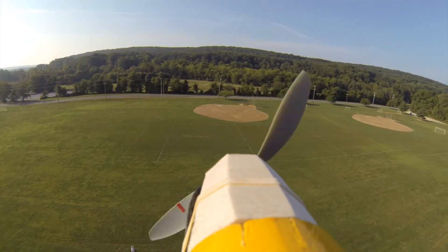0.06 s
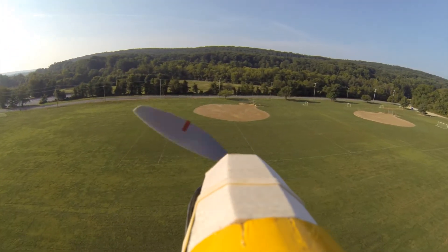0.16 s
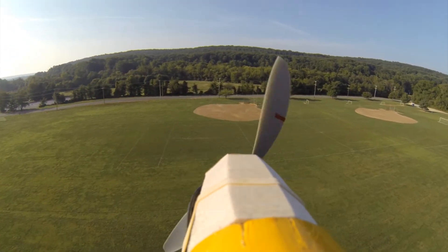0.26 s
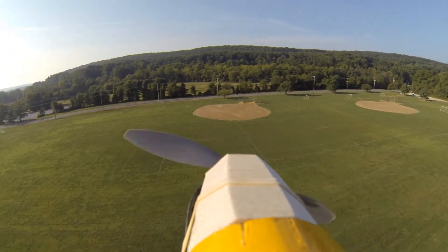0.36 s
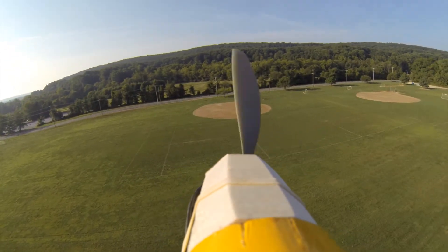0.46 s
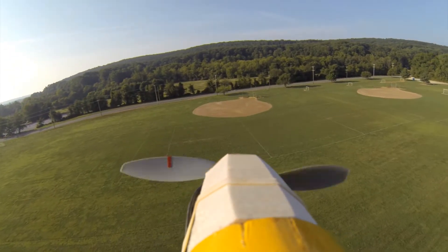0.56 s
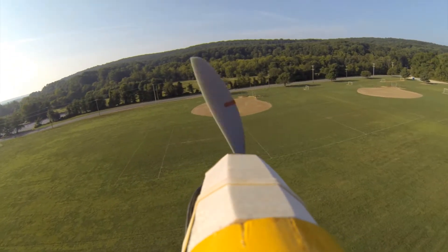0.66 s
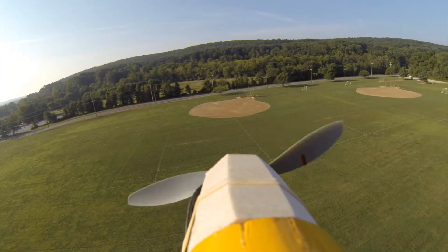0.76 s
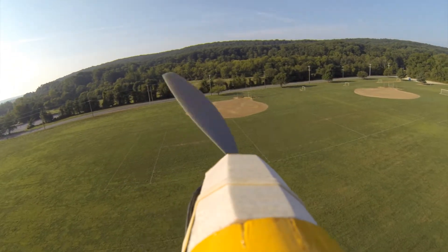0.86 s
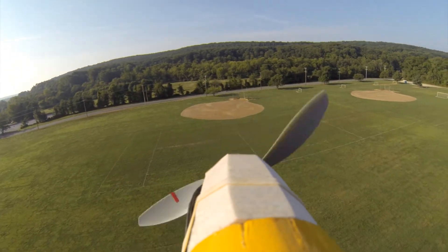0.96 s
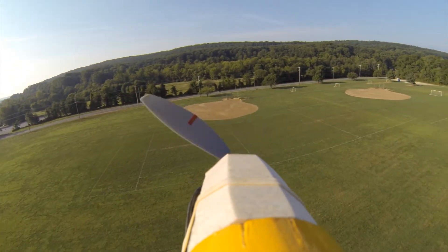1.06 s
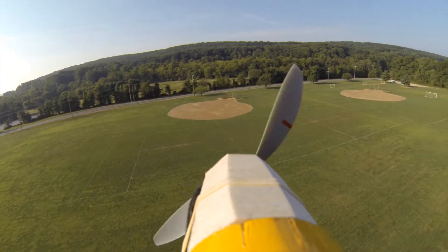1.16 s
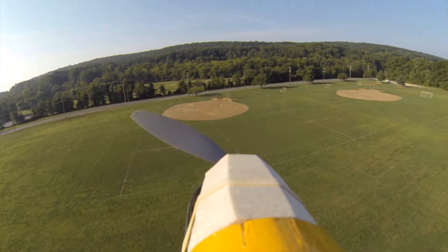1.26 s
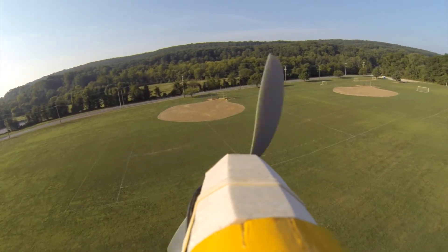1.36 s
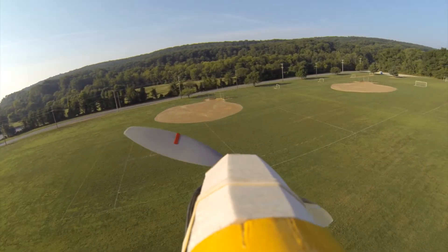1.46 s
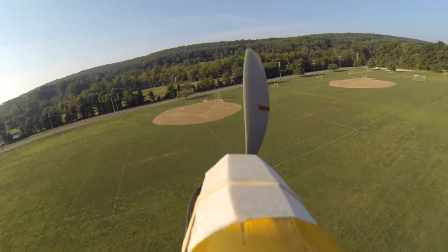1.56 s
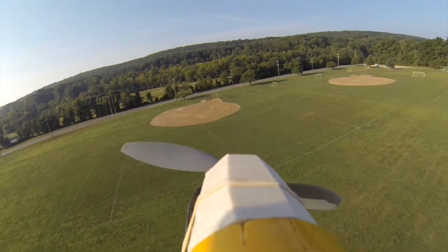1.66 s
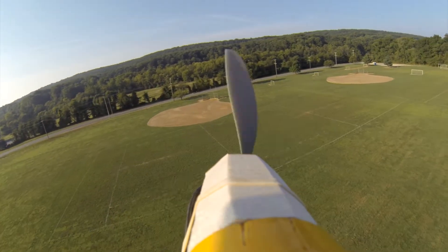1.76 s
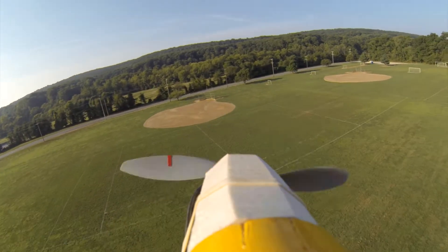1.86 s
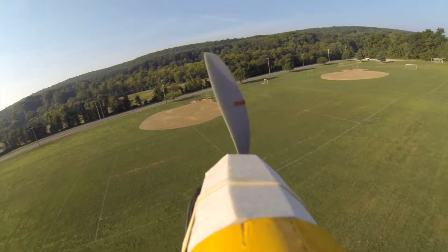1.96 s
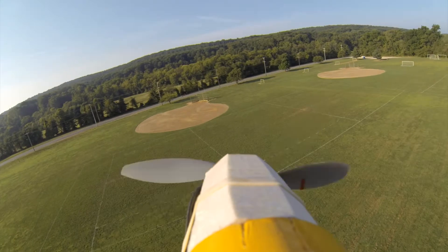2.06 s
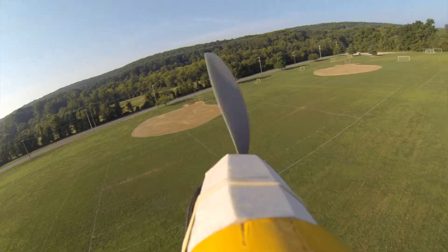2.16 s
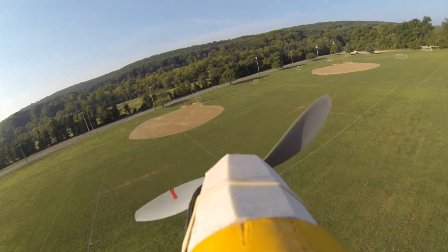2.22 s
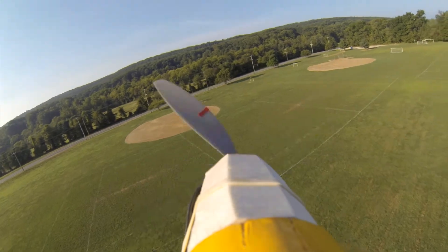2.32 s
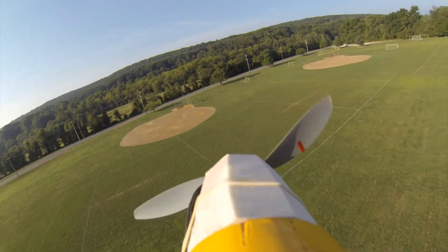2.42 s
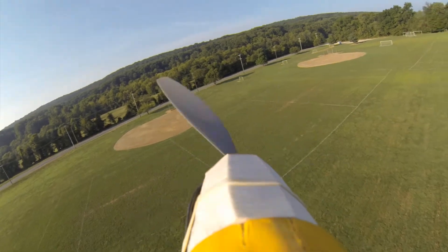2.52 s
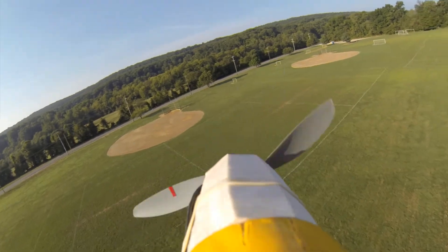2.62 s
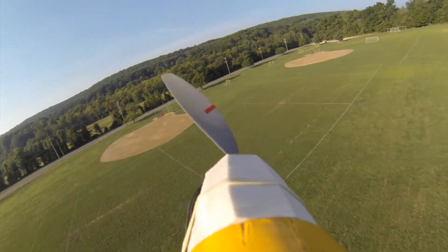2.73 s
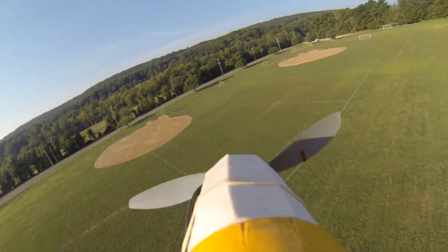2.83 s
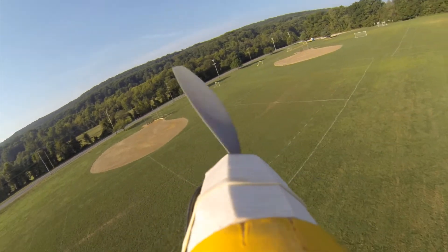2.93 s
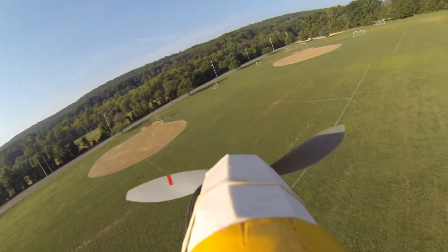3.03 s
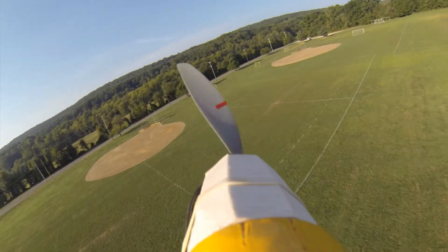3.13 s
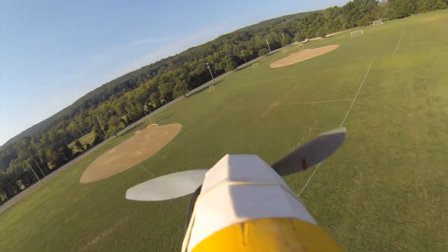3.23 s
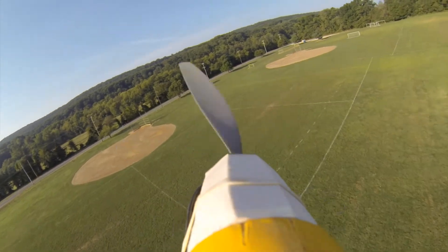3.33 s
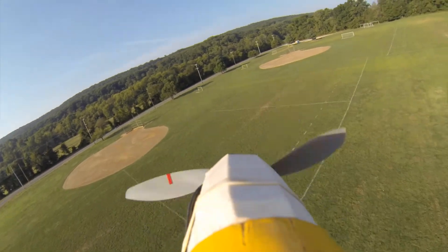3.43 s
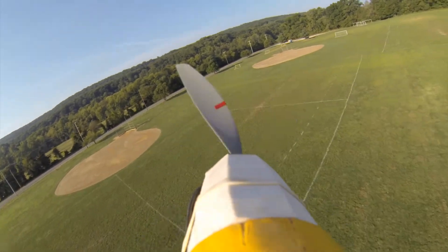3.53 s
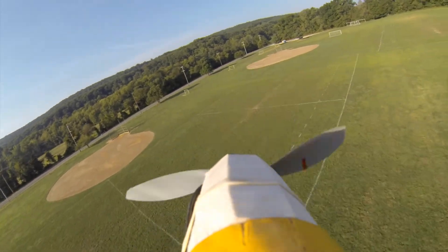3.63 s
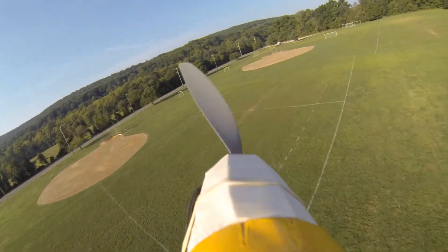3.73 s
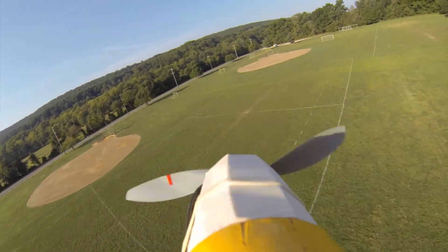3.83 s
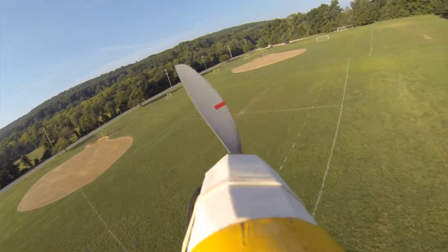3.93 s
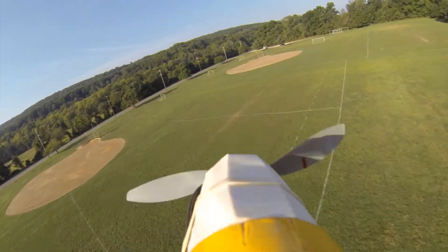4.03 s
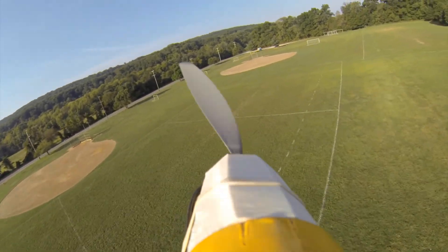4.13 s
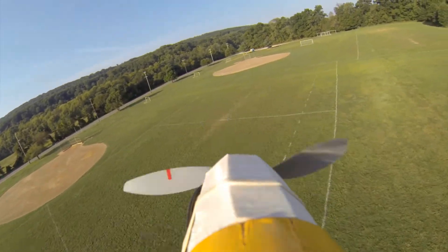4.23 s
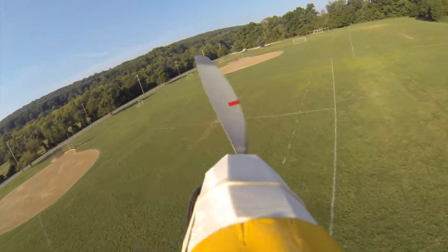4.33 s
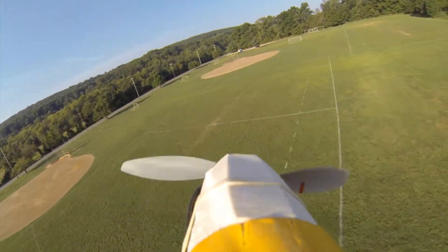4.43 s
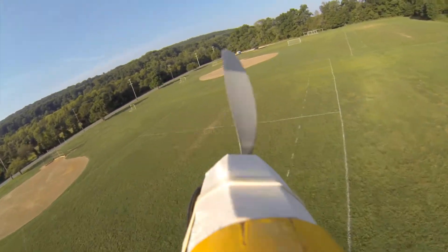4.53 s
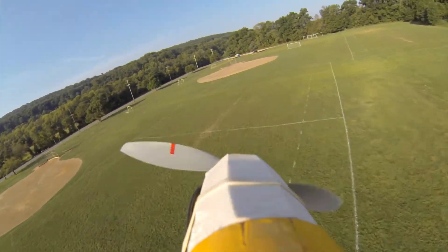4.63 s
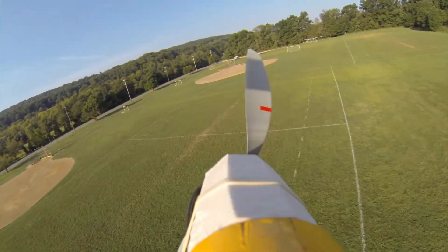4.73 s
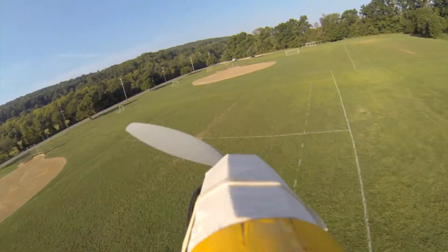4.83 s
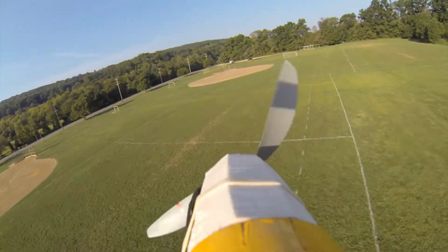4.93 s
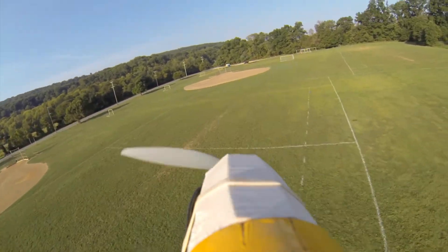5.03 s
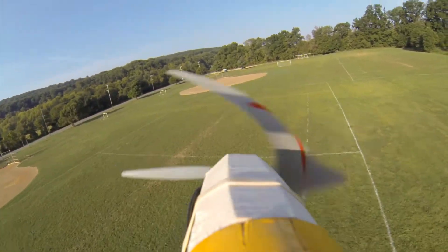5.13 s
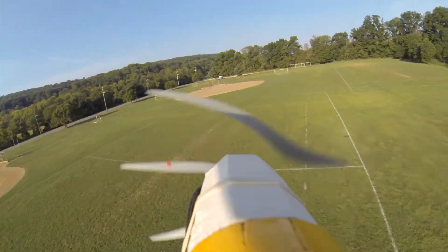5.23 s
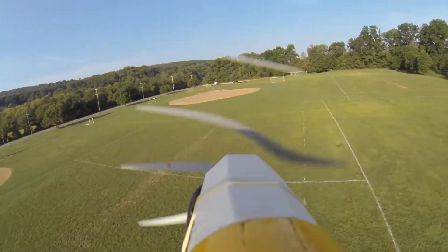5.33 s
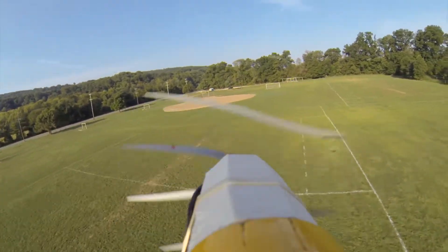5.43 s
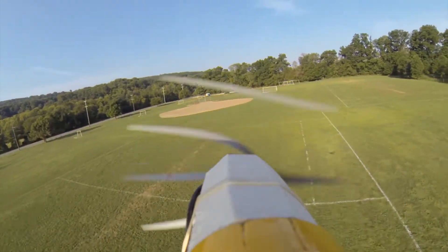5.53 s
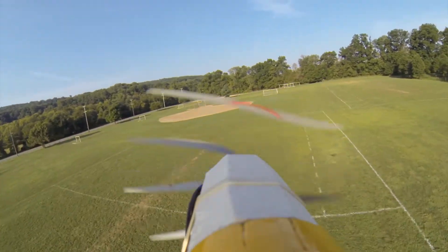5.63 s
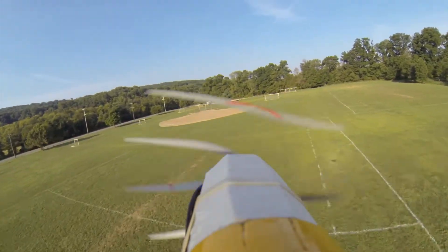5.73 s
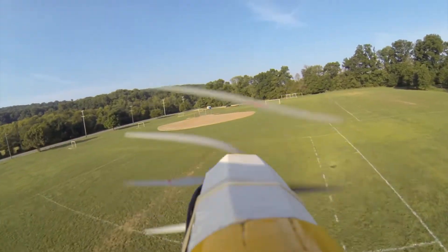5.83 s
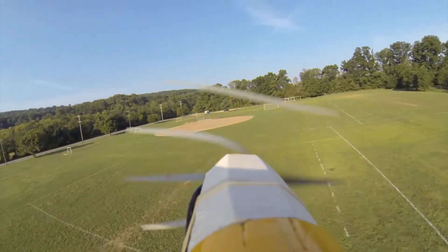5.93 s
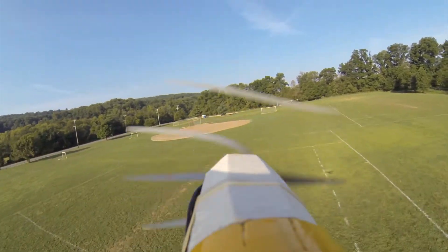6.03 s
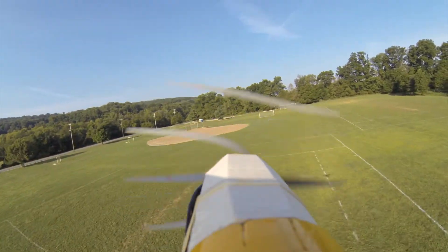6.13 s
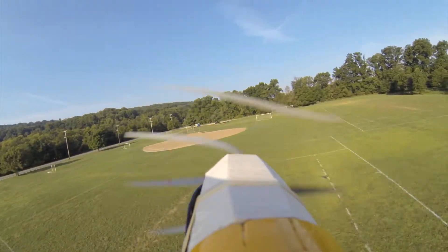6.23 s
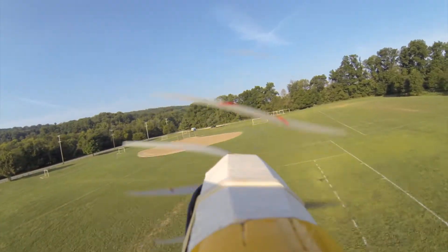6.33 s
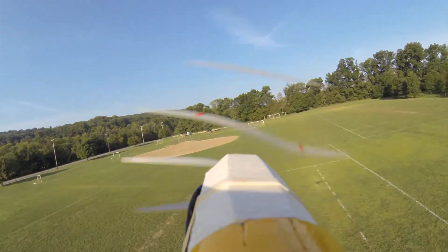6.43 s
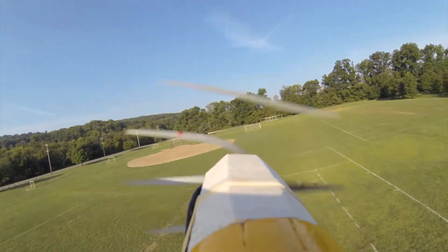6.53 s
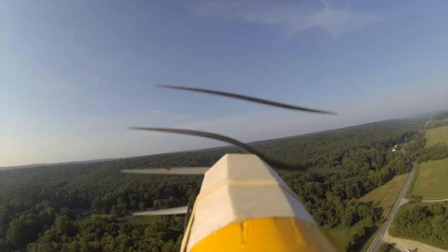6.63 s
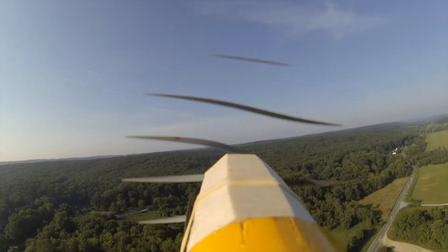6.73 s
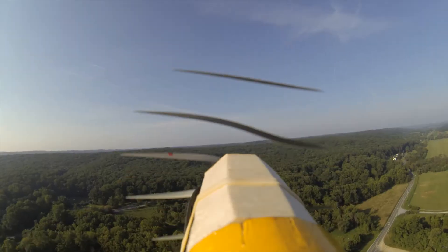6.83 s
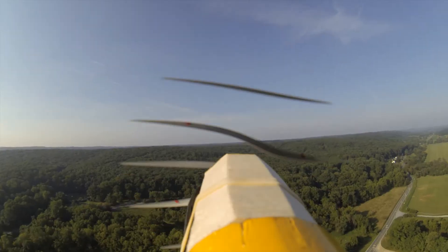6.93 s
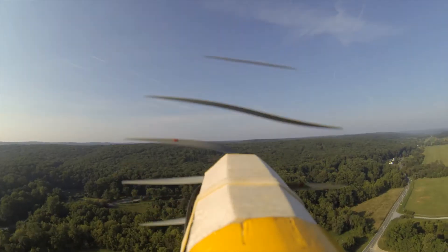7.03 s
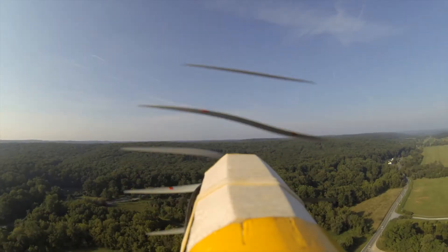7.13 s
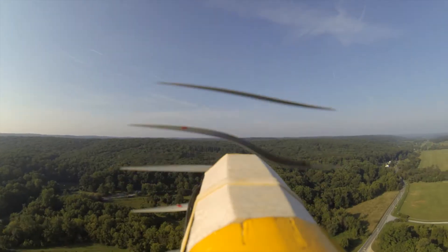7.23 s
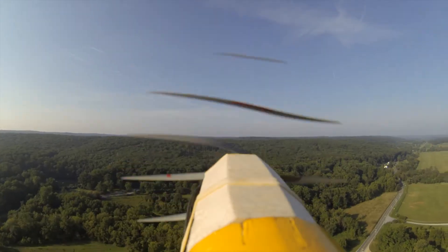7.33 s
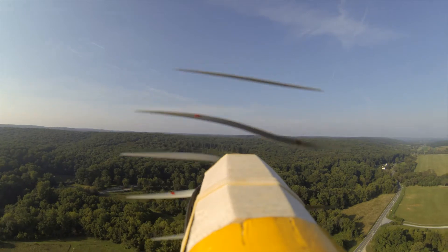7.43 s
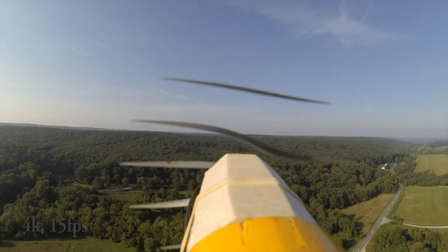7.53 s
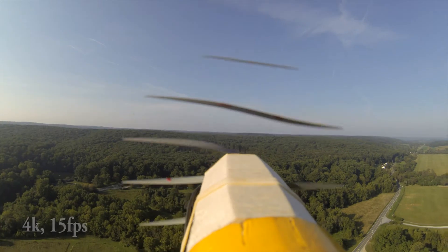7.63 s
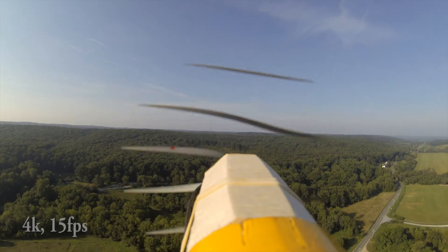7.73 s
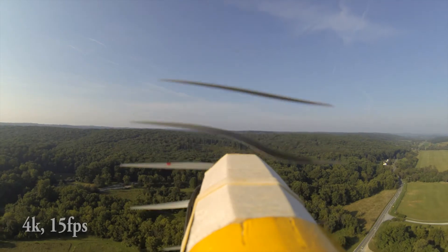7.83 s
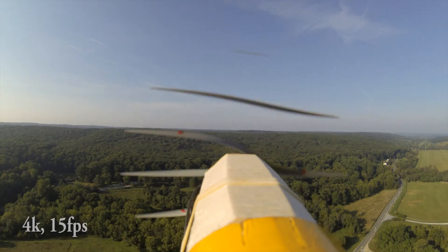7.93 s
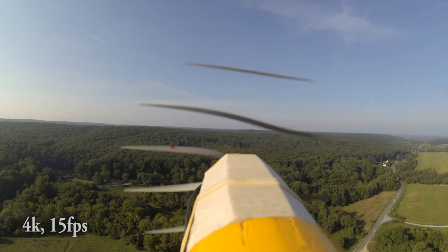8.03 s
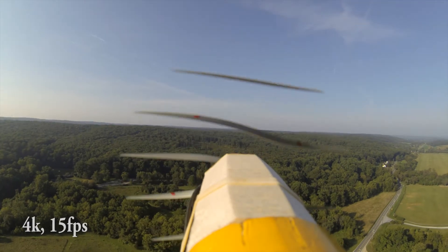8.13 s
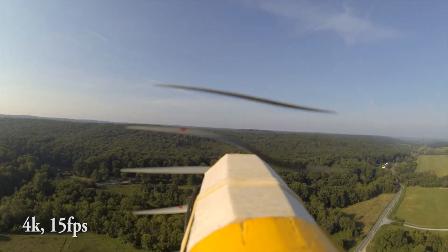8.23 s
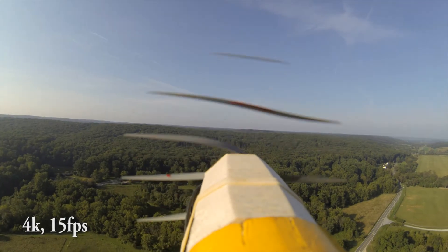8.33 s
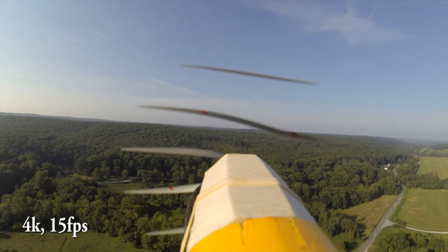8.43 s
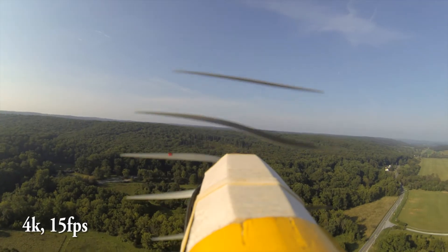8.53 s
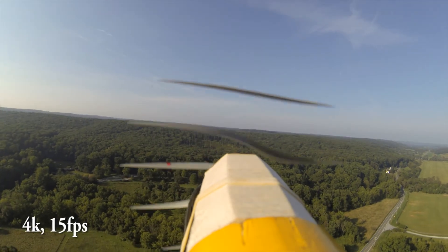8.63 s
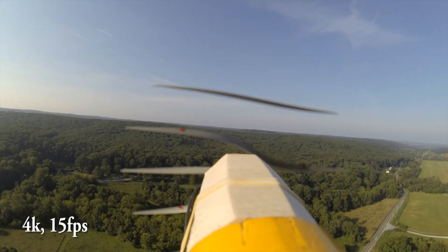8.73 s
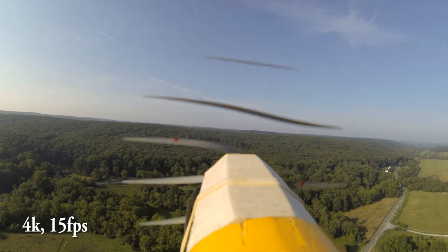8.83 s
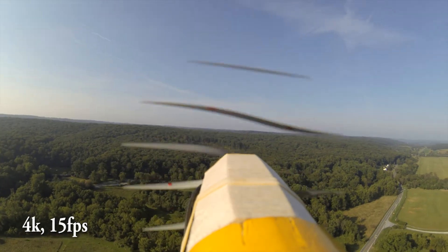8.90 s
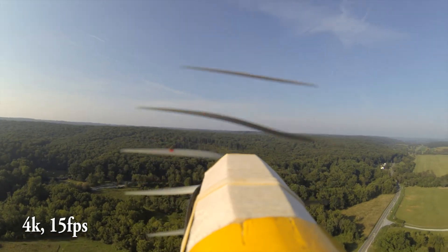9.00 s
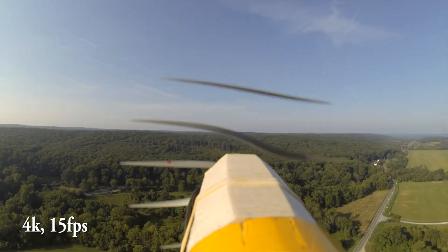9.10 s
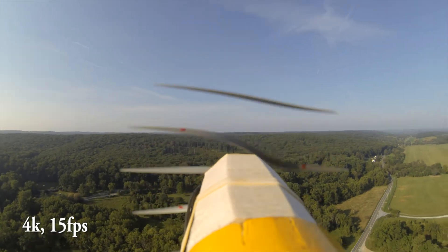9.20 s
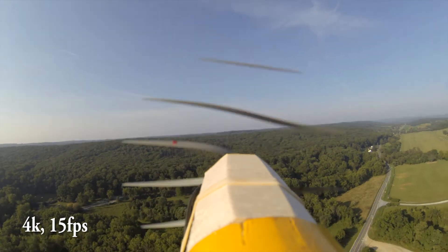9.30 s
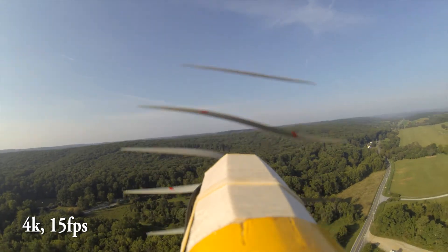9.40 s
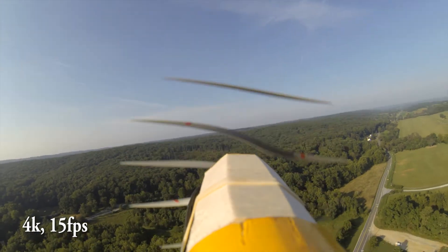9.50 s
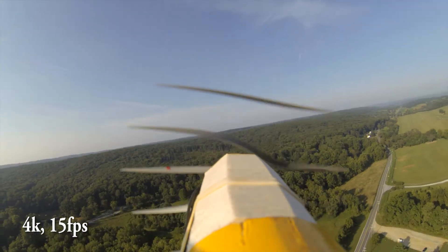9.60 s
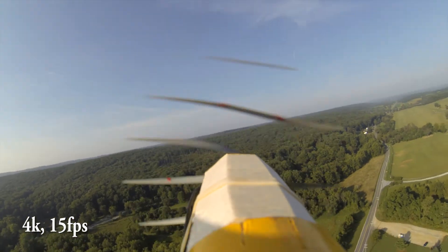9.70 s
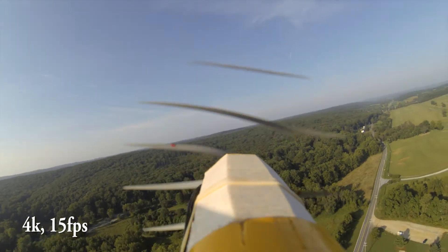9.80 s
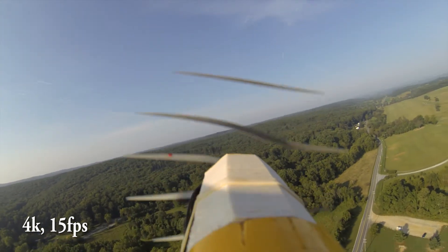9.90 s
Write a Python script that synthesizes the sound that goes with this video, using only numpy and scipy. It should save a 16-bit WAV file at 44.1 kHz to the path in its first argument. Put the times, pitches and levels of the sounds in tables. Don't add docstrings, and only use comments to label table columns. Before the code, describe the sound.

Close, dull gusts flap regularly against an onboard microphone while a small plane glides over open ground, with quiet air between. Halfway through, the electric motor sweeps up quickly, blade beats blur into a low flutter, and loud turbulent wind takes over. A thin high whine continues underneath, then changes to a higher steady cruise with a few tiny ticks.

```python
import sys
import numpy as np
from scipy import signal
from scipy.fft import rfft, irfft, next_fast_len
from scipy.io import wavfile
from scipy.ndimage import uniform_filter1d, minimum_filter1d

SR = 44100
rng = np.random.default_rng(int(sys.argv[2]) if len(sys.argv) > 2 else 0)


def transcribe(signal):
    frames = np.atleast_2d(signal).T
    limited = np.clip(frames, -1, 1)
    pcm = np.round(limited * 32767).astype(np.int16)
    wavfile.write(sys.argv[1], SR, pcm)


def voltage_ratio(level):
    return 10 ** (np.asarray(level, float) / 20)


N = 439236
T = np.arange(N) / SR
SLOTS, BLADES = 48, 2

# start_s, body_db [dB], rumble_db [dB], length_s
WAKES = [(0.084, -15, -18, 0.075), (0.301, -19.5, -20.5, 0.13), (0.522, -19, -17, 0.077),
         (0.746, -17, -18, 0.082), (0.981, -11.5, -12, 0.051), (1.196, -21, -18, 0.062),
         (1.382, -18.5, -19.5, 0.096), (1.602, -16.5, -17, 0.1), (1.814, -19, -21, 0.062),
         (2.019, -16.5, -19.5, 0.091), (2.218, -17.5, -18, 0.084), (2.418, -17, -18, 0.097),
         (2.626, -16.5, -16.5, 0.059), (2.82, -17.5, -15.5, 0.091), (3.007, -19, -17, 0.098),
         (3.217, -17, -17, 0.082), (3.429, -16, -18.5, 0.063), (3.616, -15, -16.5, 0.078),
         (3.814, -20, -18, 0.08), (4.029, -18.5, -18.5, 0.074), (4.207, -23, -18, 0.08),
         (4.405, -16, -20, 0.078), (4.604, -17, -19, 0.071), (4.795, -13.5, -17, 0.079),
         (4.98, -12, -20, 0.052), (5.084, -26, -23, 0.074)]


def evened(x):
    return x / np.sqrt(np.mean(x ** 2) + 1e-20)


def columns(rows):
    s, *values = np.transpose(rows)
    return [np.interp(T, s, v) for v in values]


def wander(hz):
    lowpass = signal.butter(2, hz, fs=SR, output="sos")
    return evened(signal.sosfilt(lowpass, rng.standard_normal(N)))


def coloured(x, lo_hz, hi_hz):
    # pitch_hz, density_db [dB per Hz]
    turbulence = [(12, -45), (30, -36), (70, -31.5), (200, -39.5), (500, -44), (1000, -50), (2000, -57.5),
                  (3000, -65), (4200, -75.5), (6000, -90), (9000, -104), (12000, -115), (12600, -130),
                  (15000, -140)]
    size = next_fast_len(N)
    hz = np.fft.rfftfreq(size, 1 / SR) + 1
    f, db = np.transpose(turbulence)
    spectrum = voltage_ratio(np.interp(np.log(hz), np.log(f), db))
    edges = 1 / np.sqrt((1 + (lo_hz / hz) ** 4) * (1 + (hz / hi_hz) ** 4))
    return irfft(rfft(x, size) * spectrum * edges, size)[:N]


def wakes():
    rise_s = 0.006
    power = np.zeros((4, N))
    for s, body_db, rumble_db, length_s in WAKES:
        at = slice(max(round((s - .03) * SR), 0), round((s + .25) * SR))
        t = T[at] - s
        rise = 1 / (1 + np.exp(-(t - rise_s) / (0.19 * rise_s + 1e-4)))
        shape = rise * np.exp(-(np.maximum(t, 0) / length_s) ** 4.95)
        fizz_db = body_db - 37.5 + 0.6 * s - 11.5
        levels_db = np.array([rumble_db - 1.0, body_db - 12.5, fizz_db])
        power[:3, at] += (voltage_ratio(levels_db)[:, None] * shape) ** 2
        power[3, at] += (voltage_ratio(fizz_db - 91 * t) * shape) ** 2
    return power


def lulls():
    s, length_s = np.array(WAKES)[:-2, [0, 3]].T[:, :, None]
    lull_s, lull_width_s, lull_db = .035, 0.041, -1
    swell_s, swell_width_s, swell_db = .16, 0.038, 2
    coarse = np.arange(0, N / SR, .002)
    t = coarse - s
    lull = lull_db * np.exp(-((t - length_s - lull_s) / lull_width_s) ** 2)
    swell = swell_db * np.exp(-((t - swell_s) / swell_width_s) ** 2)
    return np.interp(T, coarse, (lull + swell).sum(axis=0))


def stream():
    # start_s, strength_db [dB], fineness_db [dB]
    air_flow = [(0, -43, -2.5), (1.3, -41.5, -3), (1.8, -38, -0.5), (3.3, -40, -1), (3.6, -42.5, -5),
                (5.06, -42, -1.5), (5.2, -35, -5), (5.4, -38, -2.5), (5.52, -30.5, -0.5),
                (6.2, -29.5, -2.5), (6.5, -31, 2), (6.85, -28.5, 1.5), (7.4, -29, 2.5), (8.4, -28.5, 3),
                (8.9, -27, 5), (9.3, -25, 12), (9.62, -26.5, 3), (9.96, -27.5, 7.5)]
    calm_db, calm_rumble_db, calm_fizz_db = -40, -34, -73.5
    strength_db, fine_db = columns(air_flow)
    strength_db = strength_db + lulls()
    above_db = strength_db - calm_db
    rumble_db = calm_rumble_db + 0.87 * above_db - fine_db
    fizz_db = calm_fizz_db + 1.377 * above_db - 0.1 * fine_db
    sizzle_db = fizz_db - 0.7 * fine_db
    return voltage_ratio(np.array([rumble_db, strength_db, fizz_db, sizzle_db])) ** 2


def air(beat):
    even, wake = stream(), wakes()
    rumble, body, fizz = np.sqrt(even + wake)[:3]
    sizzle = np.sqrt(voltage_ratio(-4) * even[3] + voltage_ratio(16.5) * wake[3])

    large = coloured(rng.standard_normal(N) * voltage_ratio(1.1 * wander(25)), 5, 190)
    large = evened(large / uniform_filter1d(large ** 2, size=3500) ** .3)
    swing = rumble * large + 1.9 * beat
    crest = np.clip(swing / np.sqrt(uniform_filter1d(swing ** 2, size=3000) + 1e-9), -2.5, 2.5)

    gusty = np.clip(wander(120), -2.2, 2.2) * (0.75 + 0.51 * wake[1] / body ** 2)
    middle_drive = rng.standard_normal(N) * voltage_ratio(1.8 * crest + 3.33 * gusty)
    fine_drive = rng.standard_normal(N) * voltage_ratio(2.3 * crest + 3.7 * gusty)
    middle = evened(coloured(middle_drive, 185, 1300))
    middle = evened(middle + 0.036 * (middle ** 2 - uniform_filter1d(middle ** 2, size=400)))
    fine = evened(coloured(fine_drive, 1565, 3700))
    finest = evened(coloured(fine_drive, 6900, 30000))

    low = voltage_ratio(2.0) * rumble * large + voltage_ratio(2.5) * body * middle
    crests = low + 0.39 * (low ** 2 - uniform_filter1d(low ** 2, size=1500))

    deep_hz = 46.3
    above = signal.butter(2, deep_hz, "high", fs=SR, output="sos")
    below = signal.butter(2, deep_hz, "low", fs=SR, output="sos")
    surge = evened(signal.sosfilt(below, large[::-1]))
    deep = np.sqrt(even[0] + voltage_ratio(-15) * wake[0]) * surge
    small = voltage_ratio(22.5) * fizz * fine + voltage_ratio(6.0) * sizzle * finest
    return signal.sosfilt(above, crests) + voltage_ratio(-4) * deep + small


def eddies():
    # start_s, crack_db [dB], push_db [dB]
    bursts = [(0.097, -24.5, -11.5), (0.3057, -26, -8), (0.558, -25, -12), (0.7459, -26, -17),
              (0.9918, -18, -26), (1.193, -21, -10), (1.403, -22, -4.5), (1.6814, -36.5, -11.5),
              (1.8229, -16.5, -4), (2.0248, -31, -8), (2.2168, -29, -25), (2.4278, -16, -25),
              (2.623, -19, -22.5), (2.653, -22.5, -7.5), (2.823, -16.5, -28), (2.8346, -15.5, -22),
              (3.224, -22.5, -31.5), (3.271, -26.5, -16), (3.4433, -35, -36), (3.6253, -38, -13),
              (3.8298, -17.5, -20), (4.0442, -35.5, -15), (4.2322, -14, -36), (4.42, -30, -23),
              (4.613, -14.5, -8), (4.809, -20.5, -30), (4.857, -22, -14.5), (4.9865, -18.5, -8.5),
              (5.099, -21.5, -19), (5.1736, -23, -8.5),
              (0.369, -29, -26), (0.426, -33.5, -24), (0.821, -34, -22), (1.0884, -32, -18),
              (1.874, -29.5, -26), (2.5356, -31, -22), (3.1308, -35.5, -28), (3.5126, -29.5, -21),
              (3.9198, -32, -20), (4.111, -35, -20), (4.498, -30.5, -29), (5.25, -26.5, -20)]
    crack, push = np.zeros(N), np.zeros(N)
    t = np.arange(-200, 900) / SR
    for s, crack_db, push_db in bursts:
        at = slice(round(s * SR) - 200, round(s * SR) + 900)
        crack[at] += voltage_ratio(crack_db) * np.exp(-abs(t - .001) / np.where(t < .001, .0005, .0025))
        push[at] += voltage_ratio(push_db) * np.exp(-abs((t - .0015) / 0.0012) ** 2.5)
    noise = rng.standard_normal(N) * crack
    dull, bright = coloured(noise, 1000, 5500), coloured(noise, 4600, 30000)
    restore = np.sqrt(np.mean(noise ** 2) / np.mean(dull ** 2))
    return (voltage_ratio(-8.5) * dull + bright) * restore + push


def shaft(leg):
    return 2 * np.pi * np.cumsum(columns(leg)[0]) / SLOTS / SR


def blades(leg, beat_level, peaked):
    angle = BLADES * shaft(leg) + 4.93 + 0.044 * wander(21)
    on = (T > beat_level[0][0]) & (T < beat_level[-1][0])
    beat = np.sqrt(2) * (np.cos(angle) + peaked * np.cos(2 * angle)) * on
    return beat * voltage_ratio(columns(beat_level)[0] + 1.2 * wander(2.9))


def motor(leg, orders, sides):
    switch_hz = 8004.5
    angle, carrier = shaft(leg), 2 * np.pi * switch_hz * T
    whine_db, switch_db = columns(leg)[1:]
    start_s, end_s = leg[0][0], leg[-1][0]
    on = np.interp(T, [start_s - .01, start_s, end_s, end_s + .01], [0, 1, 1, 0])
    whine = voltage_ratio(whine_db + .5 * wander(20)) * np.cos(SLOTS * angle + 0.19 * wander(32))

    shake = wander(35)
    lines = np.zeros(N)
    for k, db in orders:
        strength = voltage_ratio(db + 1.8 * np.roll(shake, 997 * k))
        lines += strength * np.cos(k * angle + .6 * np.roll(shake, -997 * k))

    light = voltage_ratio(np.minimum(0.3 * (switch_db.max() - switch_db), 9))
    side_tones = sum(voltage_ratio(db) * np.cos(carrier + k * angle) for k, db in sides)
    switching = np.cos(carrier) + light * side_tones
    skirt = voltage_ratio(-32.5) * wander(250) * np.cos(carrier)
    drive = voltage_ratio(switch_db + 5.5 + 0.69 * wander(25)) * (light * lines + switching + skirt)

    hiss_band = signal.butter(8, [5300, 12150], "band", fs=SR, output="sos")
    hiss = signal.sosfilt(hiss_band, rng.standard_normal(N))
    return on * (np.sqrt(2) * (whine + drive) + voltage_ratio(.5 * switch_db - 42.0) * hiss)


def ticks():
    # start_s, peak_db [dB], rise_ms, fall_ms
    spikes = [(7.3088, -6, .2, .085), (7.805, -10, .3, .25), (8.4564, -12, .3, .2), (8.606, -9, .25, .17),
              (9.0817, -6, .3, .11), (9.3917, -6, .5, .16), (9.4105, -8, .5, .4), (9.4668, -6, .25, .12)]
    out, t = np.zeros(N), np.arange(-200, 200) / SR
    for s, db, rise_ms, fall_ms in spikes:
        shape = np.exp(-(1000 * t / np.where(t < 0, rise_ms, fall_ms)) ** 2)
        out[round(s * SR) - 200:][:len(t)] += voltage_ratio(db) * shape
    return out


def scene():
    # start_s, whine_hz (slot whine), whine_db [dB], switching_db [dB]
    spin_up = [(5.04, 200, -90, -85), (5.1, 500, -75, -72), (5.2, 1250, -56, -72), (5.248, 1683, -39, -75),
               (5.296, 1999, -39, -77), (5.336, 2262, -27, -72), (5.378, 2560, -40, -69),
               (5.43, 2895, -40, -66), (5.508, 3146, -40, -64)]
    climb_leg = [(5.58, 3250, -40, -63.5), (5.72, 3345, -40, -63), (5.87, 3389, -39.5, -61.5),
                 (6.134, 3349, -38, -61), (6.426, 3294, -37.5, -60.5), (6.53, 3256, -39, -63),
                 (6.62, 3240, -44, -68), (6.7, 3232, -66, -88)]
    cruise_leg = [(6.52, 3880, -70, -90), (6.58, 3879, -44, -80), (6.66, 3879, -39, -72),
                  (7.33, 3876, -39.5, -71), (8.4, 3897, -40.3, -71.5), (8.49, 3911, -41.3, -72),
                  (9.35, 3894, -40.2, -72), (9.6, 3905, -40.3, -72), (9.96, 3911, -41, -71.5)]
    # start_s, level_db [dB]
    climb_beat = [(5.071, -55), (5.11, -34.5), (5.25, -20), (5.38, -30), (5.44, -40), (5.6, -33),
                  (6.7, -54)]
    cruise_beat = [(6.52, -58), (6.599, -25), (6.7, -22), (7.2, -24.5), (8.92, -27.5), (8.981, -43),
                   (9.55, -38.5), (9.629, -29.5), (9.96, -24.5)]
    # shaft_order [turns], level_db [dB against the switching tone]
    climb_orders = [(25, 10), (28, 4), (32, 5), (36, 11.5), (96, -15), (144, -28)]
    cruise_orders = [(21, 8), (24, 14), (72, -17), (96, -21), (120, -27), (138, -35), (141, -33),
                     (144, -26)]
    # offset [shaft orders], level_db [dB against the switching tone]
    climb_sides = [(-48, -20), (-24, -26), (-2, -21), (-1, -28), (1, -30), (2, -19), (24, -30), (48, -26)]
    cruise_sides = [(-48, -3), (-24, -12), (-16, -22), (-2, -15), (-1, -22), (1, -18), (2, -17), (3, -27),
                    (16, -31), (24, -22), (48, -28)]

    first_leg = spin_up + climb_leg
    climb = blades(first_leg, climb_beat, peaked=.35)
    cruise = blades(cruise_leg, cruise_beat, peaked=.08)
    engine = motor(first_leg, climb_orders, climb_sides) + motor(cruise_leg, cruise_orders, cruise_sides)
    mix = air(climb + cruise) + eddies() + ticks() + climb + cruise + engine
    return mix[None]


def band_limit(x):
    return signal.sosfilt(signal.butter(12, 16000, fs=SR, output="sos"), x)


def record(dry):
    duck_from_db, duck_share, recovers_db_per_s = -14, 0.37, 21.5
    peak_db = 10 * np.log10(abs(uniform_filter1d(dry ** 2, size=90)) + 1e-12)
    fall_db = T * recovers_db_per_s
    held_db = np.maximum.accumulate(peak_db + fall_db, axis=1) - fall_db
    over_db = np.maximum(held_db - duck_from_db, 0)
    ducked = dry / voltage_ratio(duck_share * uniform_filter1d(over_db, size=400, origin=199))
    room = np.minimum(.495 / (abs(ducked) + 1e-9), 1)
    limited = ducked * uniform_filter1d(minimum_filter1d(room, size=41), size=21)
    return band_limit(limited)


dry = scene()
out = record(dry)
transcribe(out)
```